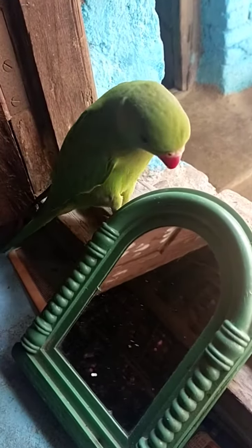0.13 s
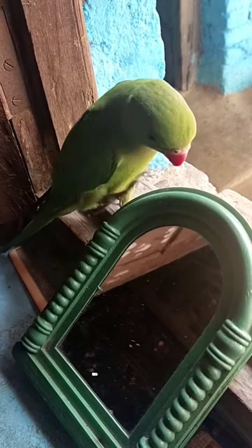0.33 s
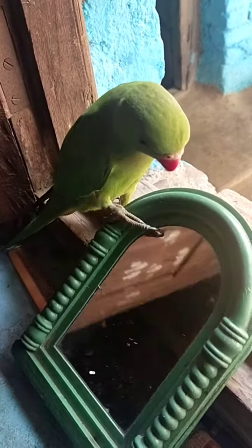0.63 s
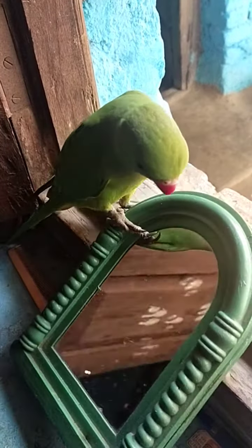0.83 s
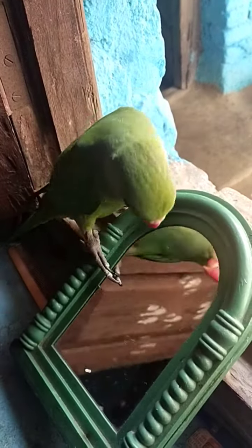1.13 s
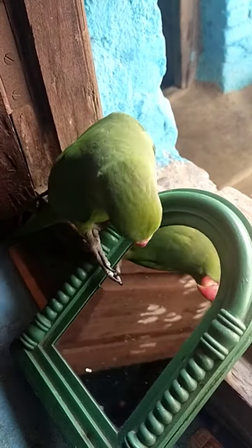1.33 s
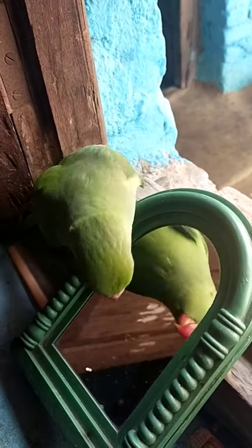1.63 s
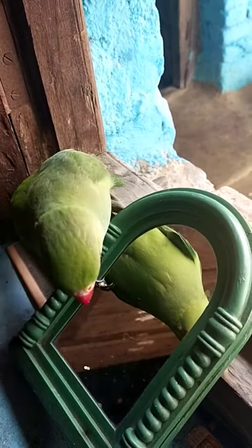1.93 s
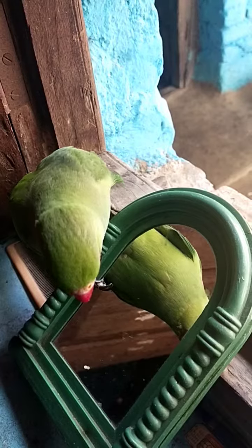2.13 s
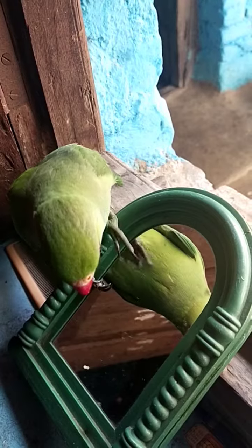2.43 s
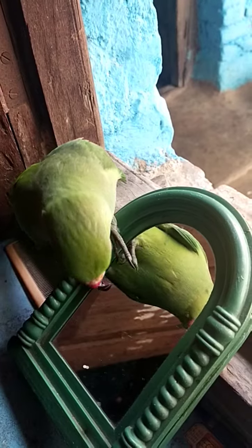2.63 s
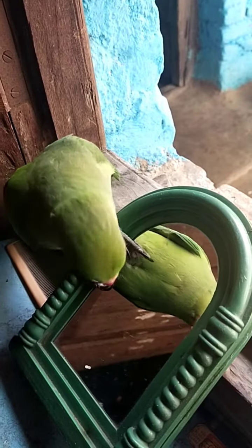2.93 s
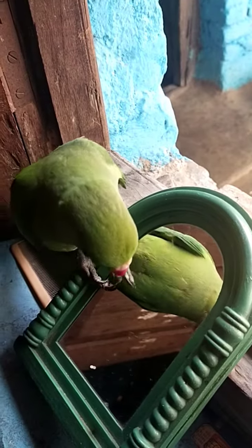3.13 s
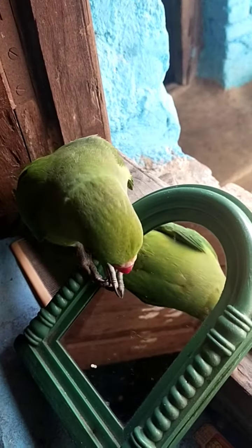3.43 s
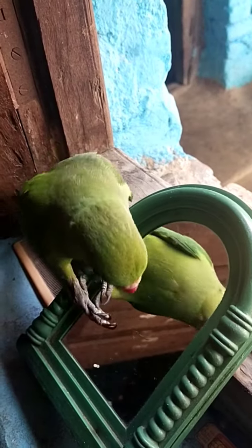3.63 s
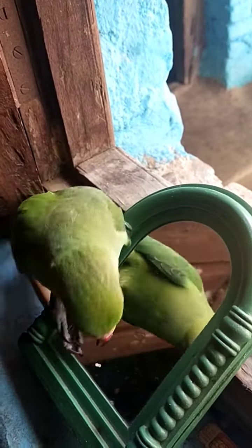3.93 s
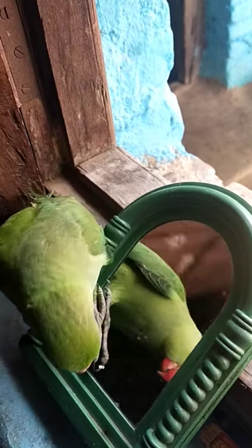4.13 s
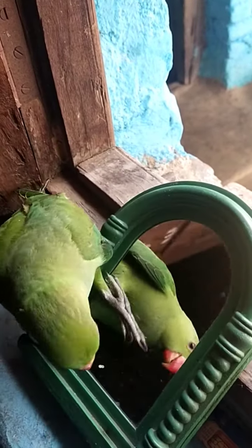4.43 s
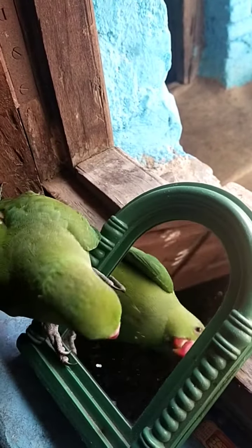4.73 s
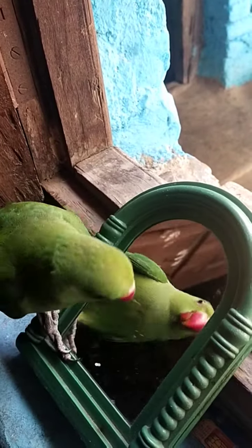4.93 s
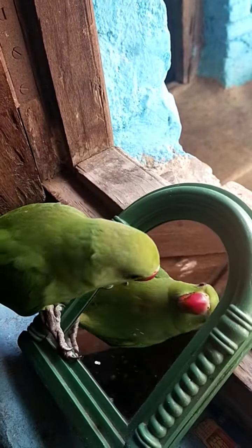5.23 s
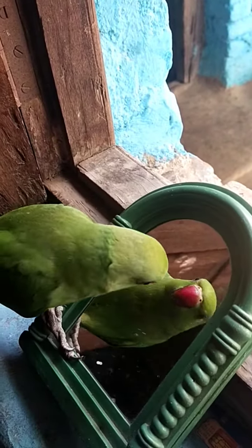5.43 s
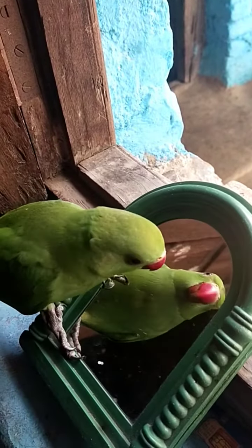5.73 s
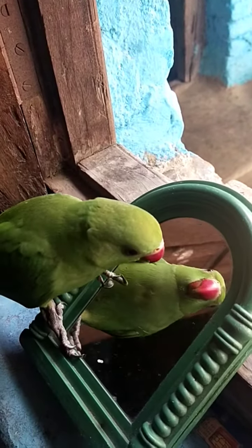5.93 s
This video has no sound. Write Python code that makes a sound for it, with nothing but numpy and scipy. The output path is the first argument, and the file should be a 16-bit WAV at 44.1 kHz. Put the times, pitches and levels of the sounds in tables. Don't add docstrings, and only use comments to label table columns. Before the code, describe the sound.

A small parrot climbs over a plastic-framed mirror on a window sill. Scattered ticks and dull double knocks come first, then quiet claw scrapes and soft feather rustle. Around four seconds a sharp hard crack on the glass is followed by a quick run of taps, then mostly quiet. A low, lumpy air hum continues throughout and swells near the end. Close phone microphone, small room, short tail.

```python
import sys
import numpy as np
from scipy import signal
from scipy.fft import rfft, irfft, next_fast_len
from scipy.io import wavfile
from scipy.ndimage import uniform_filter1d, map_coordinates

SR = 44100
rng = np.random.default_rng(int(sys.argv[2]) if len(sys.argv) > 2 else 0)


def materialize(psi):
    bounded = np.clip(np.atleast_2d(psi).T, -1, 1)
    quanta = np.round(bounded * 32767).astype(np.int16)
    wavfile.write(sys.argv[1], SR, quanta)


def ratio(d):
    e = np.asarray(d, float) / 20
    return 10 ** e


N = 268524

# time in seconds, hum level in dB.
CALM = [(0.0, -64), (0.4, -49.5), (0.95, -52), (1.35, -54.5), (2.2, -54), (2.6, -50.5), (3.3, -51.5),
        (4.1, -49.5), (4.8, -49), (5.3, -45), (5.6, -46), (6.09, -47)]
# peak time in seconds, hum level in dB, length in seconds, upper hum above lower in dB, #
# murmur above hum in dB.
GUSTS = [(0.0, -47, 0.068, -12, -9), (0.11, -48.5, 0.18, -7.5, -6.5), (0.279, -43, 0.06, -3, -22),
         (0.718, -43, 0.41, -2, -18), (1.107, -44, 0.11, 2.5, -4.5), (1.459, -47, 0.22, 14, -15),
         (1.61, -47, 0.21, -3, -12.5), (1.754, -49.5, 0.076, 16.5, -20), (1.977, -41.5, 0.24, 0, -19.5),
         (2.233, -48, 0.071, -1, -8), (2.322, -45.5, 0.058, 4, -17), (2.608, -51.5, 0.12, -14, -4.5),
         (2.714, -40, 0.092, -1, -22.5), (3.455, -44.5, 0.073, -1.5, -25), (3.555, -56.5, 0.15, 9, 1),
         (3.829, -44.5, 0.037, -17.5, -11), (4.266, -48, 0.061, 13.5, -3), (4.653, -40.5, 0.067, 4.5, -16),
         (4.85, -45.5, 0.11, 13, -11), (5.047, -42, 0.066, 1.5, -11.5), (5.504, -37, 0.033, -4, -27),
         (5.545, -43, 0.087, -13, -27), (5.65, -38.5, 0.13, 2.5, -12), (5.729, -33.5, 0.04, 1.5, -28),
         (5.769, -32.5, 0.048, 2.5, -20), (5.803, -35, 0.051, 3, -17), (5.832, -44, 0.03, -5, -6),
         (5.938, -39.5, 0.17, -8.5, -33), (6.034, -51, 0.061, 10, -7.5), (0.412, -46.5, 0.098, -1.5, -17),
         (0.63, -55, 0.067, -3, -7), (0.87, -47, 0.37, -0.5, -33), (1.331, -57.5, 0.054, 3, 2.5),
         (3.17, -57, 0.13, 4, -4)]
# pitch in Hz, width in Hz, level in dB.
HOLLOWS = [(119, 20, -1), (188, 17.8, 3), (249, 21.6, 1.5), (311.2, 26.5, 2.5), (361, 51, -3),
           (447, 31, -12)]
# pitch in Hz, level in dB per Hz.
HUM_COLOUR = [(60, -35), (110, -23), (150, 0.5), (400, 0.5), (480, 4.5), (700, -40.5)]
# pitch in Hz, level in dB per Hz.
MURMUR_COLOUR = [(300, -49), (480, 2), (580, 1.5), (670, 6), (760, -1), (860, 4), (1050, -3), (1200, 0.5),
                 (1400, -3), (1750, -17.5), (2200, -38.5)]
# pitch in Hz, level in dB per Hz.
DEEP_COLOUR = [(15, -27), (30, -13), (50, -17), (70, 0), (95, 3.5), (130, 1.5), (170, -51.5)]
# time in seconds, level in dB.
BUFFET = [(0.0, -93), (0.01, -72.5), (0.37, -64.5), (0.41, -69.5), (1.9, -67), (1.93, -53.5), (2.36, -72),
          (2.59, -63), (3.32, -69.5), (3.49, -63), (4.36, -71.5), (4.54, -58), (4.58, -84), (4.61, -57.5),
          (5.39, -76.5), (5.43, -59), (5.9, -59.5), (6.09, -64.5)]
# time in seconds, rubbing level in dB, feathers over feet in dB.
RESTLESS = [(0.0, -56.5, -9), (0.12, -65.5, -7), (0.29, -62, -10), (0.38, -70.5, -4), (1.0, -67, -10.5),
            (1.17, -59, -2), (1.42, -69.5, -3.5), (1.93, -71.5, -8.5), (2.1, -66.5, -2), (2.5, -68, -5.5),
            (2.88, -68.5, 0), (3.4, -63, -6.5), (3.83, -65.5, -5.5), (3.95, -61, -5.5), (4.6, -62.5, -7),
            (4.85, -67.5, -7.5), (5.64, -63, -9.5), (6.09, -69.5, -7.5)]
# pitch in Hz, level in dB per Hz.
SCRAPE_COLOUR = [(1100, -46.5), (1280, -15), (1380, -0.5), (1500, -7.5), (1800, -9.5), (2100, -2),
                 (2320, 4), (2550, -10.5), (2750, -11.5), (3100, -15.5), (3800, -33.5)]
# pitch in Hz, level in dB per Hz.
RUSTLE_COLOUR = [(2400, -24.5), (3400, -4), (3700, -3.5), (3900, -7.5), (4300, -5.5), (4650, -1),
                 (4900, -10), (5300, -10), (5900, -13), (6500, -28.5)]
# pitch in Hz, level in dB per Hz.
TIPS_COLOUR = [(5500, -34.5), (6300, -11.5), (6650, -1.5), (6950, -4), (7500, -6), (8100, -17.5),
               (8700, -41.5)]
# start in seconds, length in seconds, middle level in dB,
# frame knock above it in dB, glass above it in dB.
SHUFFLES = [(0.0, 0.12, -66.5, 6, -11), (0.686, 0.15, -66.5, 8.5, -8), (1.018, 0.17, -65, -3, -4.5),
            (1.492, 0.19, -69.5, 2.5, -1), (1.872, .28, -68.5, -16, -2.5), (2.775, 0.3, -76.5, 6.5, 7.5),
            (3.208, 0.27, -71.5, 5, 2), (3.502, 0.19, -66, -16, 3), (3.747, 0.13, -81, -2, 18),
            (3.875, 0.18, -73.5, 16.5, 4.5), (4.015, 0.099, -75, 18, 15.5), (4.199, 0.18, -78, 19, 14),
            (4.566, 0.19, -71, 10, 1), (5.546, 0.15, -72.5, 9, -3.5)]
# centre in seconds, length in seconds, level in dB, pitch in Hz, width in Hz.
WHISKS = [(0.241, 0.072, -66, 6840, 2000), (1.173, .18, -60.5, 3020, 3050),
          (2.132, 0.18, -68.5, 6740, 2500), (2.904, 0.24, -64.5, 4960, 1200),
          (3.359, 0.2, -65.5, 7100, 2500), (3.875, 0.17, -57, 1960, 2000), (5.168, 0.16, -60, 580, 203),
          (0.12, .12, -64, 835, 300), (0.767, 0.07, -53.5, 970, 503), (5.696, 0.26, -67.5, 2130, 400),
          (3.855, .03, -50.5, 2440, 200), (5.992, .1, -60.5, 770, 302)]
# pitch in Hz, width in Hz, level in dB.
MIRROR = [(817, 98, 1.5), (1088, 41, 7), (1400, 170, -0.5), (1772, 51, -5.5), (1930, 98, -5),
          (2344, 270, -3), (2870, 130, -1), (3360, 480, -0.5), (4040, 230, 0.5), (4445, 470, 0),
          (4610, 530, -1.5), (5005, 190, 0.5), (6180, 670, -6), (6740, 130, 0), (7130, 470, -3.5)]
# pitch in Hz, width in Hz, level in dB.
PANE = [(1070, 130, 1), (1400, 300, -9), (1735, 200, -4), (1980, 200, -2), (2430, 250, -4), (2760, 250, -5),
        (2960, 300, -1), (3200, 250, -5), (3460, 300, 0), (3860, 400, -4), (4300, 400, -7), (4650, 250, -7),
        (4990, 250, -4), (6000, 500, -12), (6890, 170, 3)]
# time in seconds, peak in dB, frame knock in dB, tip click in dB, chatter in seconds.
TAPS = [(0.1885, -31.5, -16, -4, 0.0092), (0.2864, -57, -28, -22, 0.0026), (0.588, -52, -12, -9.5, 0.031),
        (0.7282, -40, 5, -16, 0.009), (0.7589, -47, 8, -12, 0.0085), (1.028, -47, -24, -9, 0.004),
        (1.5453, -36, -9, -14, 0.0083), (1.877, -52, 2, -22, 0.0068), (1.908, -40.5, -26, -47, 0.0027),
        (2.071, -34, -27.5, -2.5, 0.0064), (2.4532, -60, -9, 8, 0.015), (3.01, -55.5, -6, 12, 0.0097),
        (3.5597, -41, -10, 11, 0.0071), (4.1893, -47, 0, -9, 0.013), (4.2008, -35.5, 3, -18, 0.009),
        (4.2241, -32, 2.5, -13.5, 0.0085), (4.2597, -44, 3, -24, 0.0082), (4.2786, -41.5, -15, 5, 0.0088),
        (4.378, -38, -8, 2.5, 0.0066), (4.4563, -38, -10, 2, 0.0049), (4.2215, -46, -13, 9, 0.004),
        (4.312, -57, -8, 10, 0.003), (4.2895, -48, -4, 5, 0.006), (4.5545, -61, -1, 2, 0.0073),
        (4.5848, -49, -4, 1, 0.0094), (4.6088, -48, -3, 6, 0.011), (5.6234, -51.5, -43, -7, 0.0078)]
# time in seconds, peak in dB, frame knock in dB, tip click in dB,
# chatter in seconds.
BLOW = [(4.0109, -22, -7.5, -9, 0.007)]
# time in seconds, peak in dB, frame knock in dB, tip click in dB.
DRAGS = [(0.2104, -48.5, 0, -13), (1.087, -50, -5, -23), (1.111, -42, -3, -21), (1.137, -46, 18, -20),
         (1.1665, -52, 18, -19), (1.32, -50.5, -30, -17), (3.8425, -41.5, 7, -29), (3.875, -32, -8, -4.5)]
# time in seconds, peak in dB, frame knock in dB, tip click in dB.
SLIPS = [(1.937, -47, -3, -18), (1.9525, -43.5, -18, -21), (1.9716, -38, -21, -22),
         (1.9896, -46.5, -3, -12), (2.029, -38, -42.5, -21), (3.584, -55, -10, -9), (3.7858, -50.5, -21, 0),
         (3.8102, -45, -14, -4), (3.8667, -35.5, 2, -16), (0.7, -68, -5, -27), (3.8816, -47, -16, -3),
         (3.9015, -41.5, 2, -10.5), (3.921, -49.5, 19, -29), (3.938, -49, 3, -10), (3.9504, -48, -13, -3.5),
         (4.0788, -49, 3, -9), (4.2379, -60, -9, -27), (4.2505, -37, 8, -14), (4.3093, -55, -9, -11),
         (2.018, -44.5, -24, -24), (1.862, -57, -8, -21), (4.6501, -44, -2, -13), (4.868, -68, -16, 7),
         (5.332, -63, -3, -4)]
# time in seconds, peak in dB, pitch in Hz, width in Hz.
THUDS = [(4.012, -23.5, 3000, 2500), (0.189, -32.5, 1180, 700), (0.2865, -47, 2550, 600),
         (0.2865, -45, 6700, 900), (0.731, -35, 646, 350), (0.7295, -25, 970, 400), (0.778, -45, 970, 350),
         (0.76, -31, 650, 350), (0.761, -36, 924, 400), (1.1, -44, 850, 350), (1.552, -49, 2270, 350),
         (1.5, -55, 620, 340), (1.954, -32.5, 2350, 400), (2.073, -43, 7130, 600),
         (4.0098, -36, 2500, 1500), (4.012, -37.5, 1110, 350), (4.014, -35, 6900, 350),
         (4.0153, -23, 1740, 600), (4.0115, -21.5, 4900, 807), (4.202, -30.5, 3140, 1200),
         (4.205, -33, 1100, 600), (4.2245, -23, 1900, 900), (4.26, -24, 900, 700), (4.265, -35.5, 270, 250),
         (4.3785, -28, 7050, 600), (4.3785, -35, 3230, 990), (4.4567, -32.5, 3420, 700),
         (4.46, -38, 7050, 594), (4.609, -39, 3500, 1500), (5.336, -45, 2290, 400),
         (0.7285, -39, 2500, 1990), (0.761, -39, 2500, 2000), (1.028, -48, 2800, 2000),
         (1.548, -41, 1210, 700), (2.072, -51, 1500, 600), (3.8778, -18, 3500, 2500),
         (3.879, -26.5, 7100, 900), (3.8805, -28.5, 3000, 1500), (3.8845, -31, 2400, 1200),
         (3.89, -33, 3600, 1200), (3.906, -36, 2200, 900), (3.955, -36, 3900, 800), (4.19, -44, 3100, 900),
         (4.251, -43, 3300, 1000), (4.28, -34, 2000, 900), (4.586, -35, 3500, 2000)]
# time in seconds, peak in dB, pitch in Hz, width in Hz.
SNAPS = [(0.2862, -42, 2550, 500), (0.29, -55, 2550, 500), (0.7288, -36.5, 1500, 1500),
         (0.7327, -33, 960, 450), (0.7601, -35.5, 950, 400), (4.203, -37, 2200, 1500),
         (4.2065, -52, 1200, 700), (4.269, -35.5, 330, 250), (4.2915, -38, 3000, 2000),
         (4.191, -43, 3200, 900), (4.19, -49, 7400, 900), (4.652, -45, 3500, 1200), (4.653, -58, 6300, 900),
         (1.0275, -59, 2500, 1500), (3.858, -44, 3000, 3000), (3.8775, -33, 3500, 2500),
         (3.881, -35, 3200, 2500), (3.8866, -31, 2800, 2000), (0.189, -28.5, 2190, 600),
         (0.189, -35, 6900, 1500), (0.1909, -35, 4060, 900), (1.5456, -36.5, 2300, 456),
         (1.546, -45.5, 3630, 694), (1.879, -51.5, 2780, 2000), (4.3783, -32.5, 3290, 900),
         (4.3785, -38, 2080, 900), (4.38, -38, 6990, 350), (4.4568, -34.5, 3480, 600),
         (4.456, -43, 2200, 900), (4.461, -49.5, 7040, 600), (4.202, -37, 3200, 1500),
         (4.224, -28, 3200, 1500), (4.228, -33, 1900, 1000), (4.2613, -29, 1400, 1100),
         (4.2805, -44, 2500, 2000), (4.312, -50, 5200, 1500), (4.555, -49, 3000, 3000),
         (4.5565, -50.5, 5500, 1500), (4.5858, -44, 3000, 2500), (4.588, -47, 5200, 1200),
         (4.6097, -48, 7500, 900), (4.612, -47.5, 5500, 1500)]
# time in seconds, peak in dB, pitch in Hz, width in Hz.
CRACK = [(4.0097, -30, 2600, 1500), (4.0113, -12.5, 3000, 1700), (4.0122, -19, 2200, 1500),
         (4.0135, -23, 3500, 1500), (4.0143, -22, 2000, 1200), (4.0163, -25, 3600, 1500),
         (4.0125, -28, 1070, 220), (4.0128, -31, 6890, 350)]
# pitch in Hz, time to fall 60 dB in seconds.
ROOM = [(500, 0.28), (2500, 0.15), (8000, 0.11)]
# pitch in Hz, level in dB.
MIC = [(20, -13), (60, 1.5), (7600, -2.5), (8200, -12.5), (8800, -27.5), (10000, -62)]


def unit(x):
    return x / np.sqrt(np.mean(x ** 2) + 1e-20)


def along(points, hz):
    f, value = np.transpose(points)
    return np.interp(np.log(hz + 1), np.log(f + 1), value)


def curves(rows):
    s, *columns = np.transpose(rows)
    return [np.interp(np.arange(N) / SR, s, column) for column in columns]


def wobble(rate):
    knots = rng.standard_normal(int(N * rate / SR) + 4)
    return map_coordinates(knots, [np.arange(N) * rate / SR])


def filtered(x, response):
    m = next_fast_len(len(x) + 8192)
    return irfft(rfft(x, m) * response(np.fft.rfftfreq(m, 1 / SR)), m)[:len(x)]


def resonances(modes):
    def response(f):
        total = 0
        for k, (hz, width_hz, db) in enumerate(modes):
            damping = 1j * f * width_hz
            total = total + (-1) ** k * ratio(db) * damping / (hz * hz - f * f + damping)
        return total
    return response


def smoothed(x, size, axis, mode):
    return uniform_filter1d(uniform_filter1d(x, size=size[0], axis=axis[0]), size=size[1], axis=axis[1], mode=mode)


def rush(colour, patchy_db, grain_db, grain_rate):
    grainy = rng.standard_normal(N) * ratio(grain_db * wobble(grain_rate))
    z = signal.stft(grainy, nperseg=1024)[2]
    patches = smoothed(rng.standard_normal(z.shape), (12, 9), (0, 1), "wrap")
    ridges = smoothed(rng.standard_normal(z.shape), (2, 30), (0, 1), "wrap")
    uneven_db = patchy_db * (0.82 * unit(patches) + unit(ridges))
    noise = signal.istft(z * ratio(uneven_db), nperseg=1024)[1][:N]
    return unit(filtered(noise, lambda hz: ratio(along(colour, hz))))


def evened(x, span_s):
    size = round(span_s * SR)
    power = uniform_filter1d(uniform_filter1d(x ** 2, size=size), size=size)
    return unit(x / np.sqrt(np.abs(power) + 1e-20))


def gusts():
    rise, slope_db = 0.47, 10
    t = np.arange(0, N / SR + .002, .002)
    calm = ratio(np.interp(t, *np.transpose(CALM))) ** 2
    s, db, length, upper_db, murmur_db = np.transpose(GUSTS)[..., None]
    after = (t - s) / np.maximum(length, .01)
    power = ratio(db - slope_db * np.maximum(after, -after / rise)) ** 2
    hum = calm + power.sum(0)
    murmur = calm * ratio(-14.5) ** 2 + (power * ratio(murmur_db) ** 2).sum(0)
    upper = ((power * upper_db).sum(0) - 1.3 * calm) / hum
    return curves(np.transpose([t, 10 * np.log10(hum), 10 * np.log10(murmur), upper]))


def air():
    hum_db, murmur_db, upper_db = gusts()
    draught = rush(HUM_COLOUR, patchy_db=-0.54, grain_db=2.0, grain_rate=19)
    lower = filtered(draught, resonances(HOLLOWS[:3])) + 0.077 * draught
    upper = filtered(draught, resonances(HOLLOWS[3:]))
    lower = evened(lower, 0.1) * np.std(lower)
    upper = evened(upper, 0.088) * np.std(upper)
    hum = (ratio(-upper_db / 2) * lower - ratio(upper_db / 2) * upper) / np.std(lower - upper)
    murmur = evened(rush(MURMUR_COLOUR, patchy_db=3.4, grain_db=1.2, grain_rate=41), .08)
    rumble = evened(rush(DEEP_COLOUR, patchy_db=1.5, grain_db=-1.0, grain_rate=53), 0.24)
    deep = ratio(curves(BUFFET)[0]) * rumble
    return ratio(hum_db - 2.5 + 1.4 * wobble(14)) * hum + deep + ratio(murmur_db - 0.9) * murmur


def rubbing():
    scrape_db, feathers_db = curves(RESTLESS)
    scrape = rush(SCRAPE_COLOUR, patchy_db=3.2, grain_db=1.0, grain_rate=56)
    rustle = rush(RUSTLE_COLOUR, patchy_db=3.2, grain_db=0.3, grain_rate=68)
    tips = rush(TIPS_COLOUR, patchy_db=2.6, grain_db=0.5, grain_rate=77)
    feet = ratio(scrape_db + 1.3 + 3.9 * wobble(7.6)) * scrape
    feathers = ratio(scrape_db + feathers_db + 0.5) * rustle
    return feet + feathers + ratio(scrape_db + 1.03 * feathers_db - 2.5) * tips


def scuffles():
    edge_s, fade_db = 0.054, -1
    grit = rng.standard_normal((3, N)) * ratio(2.0 * wobble(120) + 0.4 * wobble(48))
    bodies = MIRROR[:3], MIRROR[3:6], MIRROR[6:]
    low, middle, high = [unit(filtered(g, resonances(body))) for g, body in zip(grit, bodies)]
    out, t = np.zeros(N), np.arange(N) / SR
    for s, length, db, knock_db, glass_db in SHUFFLES:
        edges = np.clip(np.minimum(t - s, s + length - t) / edge_s, 0, 1)
        on = edges * ratio(db - fade_db * np.clip((t - s) / length, 0, 1))
        out += on * (ratio(knock_db + 1.5) * low + ratio(5.5) * middle + ratio(glass_db) * high)
    return out


def whisks():
    out = np.zeros(N + SR)
    for s, length, db, hz, width_hz in WHISKS:
        hiss = rng.standard_normal(SR // 2)[:round(2 * length * SR)]
        band = resonances([(hz, width_hz, 0)])
        brush = unit(filtered(hiss, lambda f: band(f) ** 2))
        out[round((s - length) * SR):][:len(hiss)] += ratio(db) * np.hanning(len(hiss)) * brush
    return out[:N]


def contacts(table, body, blow, rise, pane_db):
    out, t = np.zeros(N + SR), np.arange(4096) / SR
    chance = rng.standard_normal((len(table), 3, len(t)))
    for (s, db, knock_db, tip_db, chatter), (sign, size, scatter) in zip(table, chance):
        chatter = max(chatter, .001)
        glass_db = 0.58 * knock_db + 0.61 * tip_db + pane_db
        fade = np.clip((t - .001) / (rise * chatter), 0, 1)
        fade = fade / (1 + (t / chatter) ** 6) * ratio(-6 * t / chatter)
        force = sign * ratio(4.5 * size) * fade * 0.59
        force[0], force[50] = 0.043 * blow, blow
        # (Hz, dB)
        share = [(1200, knock_db - 3.5), (2200, 0.11), (3300, glass_db - .6),
                 (4300, 0.45 * glass_db + 0.12 * tip_db - 3.5),
                 (5500, 0.45 * glass_db + 1.0 * tip_db - 1), (7000, tip_db - 3.5)]
        shift = 1 + .007 * scatter[99:]
        modes = [(hz * a, width, level + 0.5 * along(share, hz) + 0.5 * b)
                 for (hz, width, level), a, b in zip(body, shift, scatter)]
        ring = filtered(force, lambda f: resonances(modes)(f) * ratio(0.3 * along(share, f)))
        middle = filtered(ring, resonances([(2200, 1000, 0)]))
        out[round(s * SR) - 30:][:len(t)] += ratio(db - 0.5) * ring / np.abs(middle).max()
    return out[:N]


def taps():
    light = contacts(TAPS, MIRROR, blow=2.34, rise=0.15, pane_db=-5.0)
    hard = contacts(BLOW, PANE, blow=4, rise=.1, pane_db=6)
    slips = [(*row, 0.032) for row in DRAGS] + [(*row, 0.02) for row in SLIPS]
    touched = light + hard + contacts(slips, MIRROR, blow=.05, rise=0.025, pane_db=0.5)
    low_hz, high_hz = 850, 7040
    return filtered(touched, lambda f: (1j * f / (low_hz + 1j * f)) ** 2 / (1 + 1j * f / high_hz))


def thuds():
    strike, push_cycles = 2.1, 26
    out, t = np.zeros(N + SR), np.arange(4096) / SR
    for (s, db, hz, width_hz), push in zip(THUDS, rng.standard_normal((len(THUDS), len(t)))):
        mode = resonances([(hz, width_hz, 0)])
        force = push * ratio(-60 * t * width_hz / push_cycles) + strike * np.sqrt(SR / width_hz) * (t == 0)
        knock = filtered(force, lambda f: mode(f) ** 2)
        out[round(s * SR):][:len(t)] += ratio(db - 6.0) * knock / np.abs(knock).max()
    return out[:N]


def snaps():
    out, blow = np.zeros(N + SR), np.arange(1024) == 0
    for s, db, hz, width_hz in CRACK + SNAPS:
        mode = resonances([(hz, width_hz, 0)])
        click = filtered(blow, lambda f: mode(f) ** 3)
        out[round(s * SR):][:len(click)] += ratio(db) * click / np.abs(click).max()
    return out[:N]


def room(x):
    out, step = np.zeros(N + SR), SR // 20
    for k in range(0, N, step):
        hz, t, z = signal.stft(rng.standard_normal(SR // 4), SR, nperseg=256)
        dying = ratio(-60 * t / along(ROOM, hz)[:, None])
        tail = signal.istft(z * dying, SR, nperseg=256)[1]
        wet = signal.fftconvolve(x[k:k + step], tail / np.linalg.norm(tail))
        out[k + 200:][:len(wet)] += wet
    return out[:N]


def scene():
    ticks = taps() + scuffles() + thuds() + snaps()
    wet = ratio(-16.5) * room(ticks)
    return (ticks + wet + rubbing() + whisks() + air())[None]


def band_limit(x):
    return signal.sosfilt(signal.butter(12, 8560, fs=SR, output="sos"), x)


def record(dry):
    mix = filtered(dry[0], lambda hz: ratio(along(MIC, hz)))[None]
    return band_limit(mix)


dry = scene()
out = record(dry)
materialize(out)
```